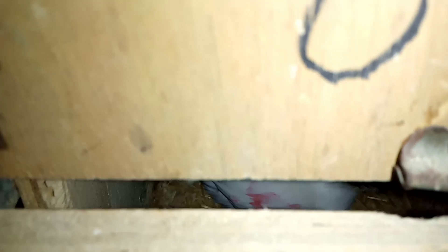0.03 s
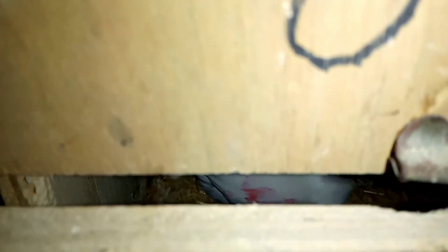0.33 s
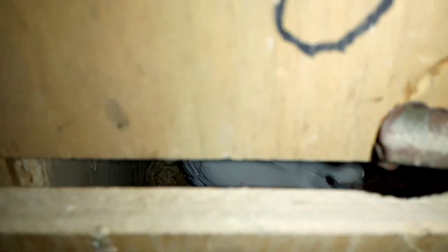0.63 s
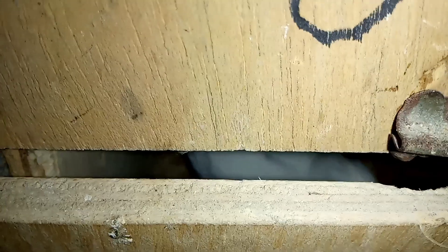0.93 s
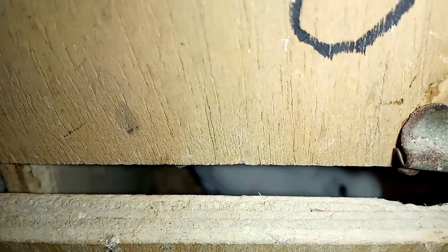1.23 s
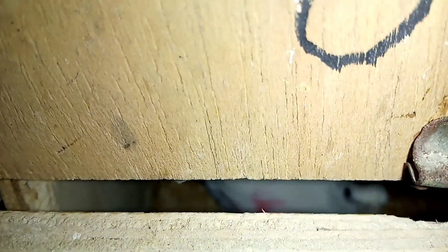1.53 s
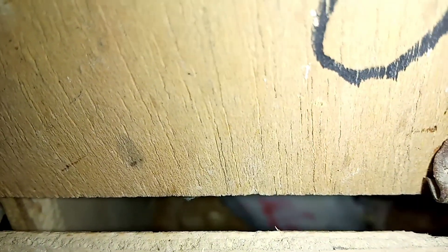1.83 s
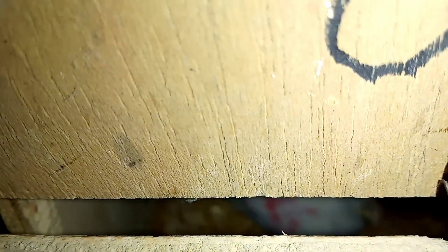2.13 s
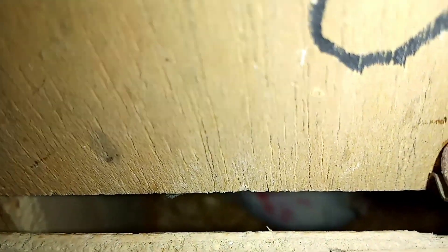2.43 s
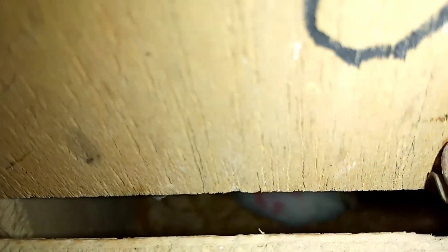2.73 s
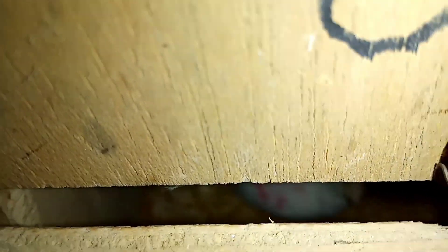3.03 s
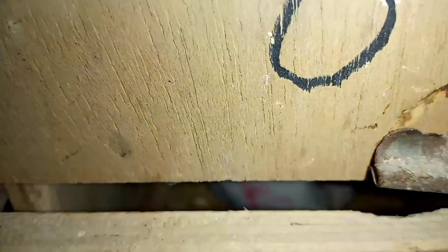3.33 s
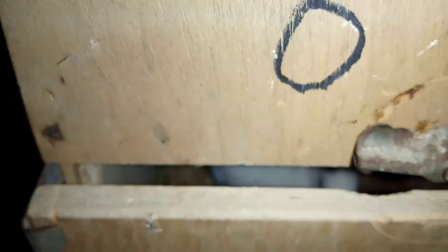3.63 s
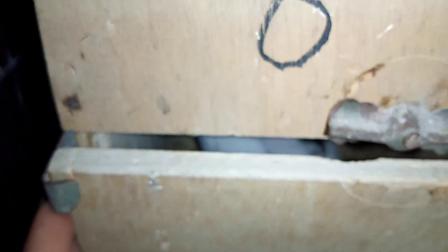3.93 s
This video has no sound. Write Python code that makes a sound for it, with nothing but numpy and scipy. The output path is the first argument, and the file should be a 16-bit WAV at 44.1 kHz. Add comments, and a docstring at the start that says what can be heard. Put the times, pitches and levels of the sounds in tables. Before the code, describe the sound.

A bird hisses breathily throughout, inside a wooden nest box that rings briefly. A hoarse arching cry comes at about 0.5 seconds, a harsh rasp at 1.7 and a weak cry at 2.3. The loudest cry follows near 2.9 seconds and another near 3.7. Thin, short falling whistles are scattered between them. Faint handling scuffs and a dull rub near the end lie over a low room hum.

```python
"""A steady hiss breaks into hoarse arching cries, thin falling whistles and one rasp.
It is a cockatiel inside a wooden nest box, heard through the gap under the lid. Turbulent air in
the open beak makes the hiss and rasp; cries and whistles are tones roughened by random modulation.
The box rings briefly. A few faint scuffs of handling and a dull rub lie over a low room hum."""
import sys
import numpy as np
from scipy import signal
from scipy.fft import rfft, irfft
from scipy.io import wavfile

SR = 44100
rng = np.random.default_rng(int(sys.argv[2]) if len(sys.argv) > 2 else 0)


def file_out(sig):
    """Save sig as 16-bit WAV at sys.argv[1]."""
    # one column per channel
    cols = np.atleast_2d(sig).T
    # limit, then scale
    lim = np.clip(cols, -1, 1)
    pcm = np.round(lim * 32767).astype(np.int16)
    wavfile.write(sys.argv[1], SR, pcm)


N = 176400
T = np.arange(N) / SR
EDGE_S, FLUTTER_HZ = .004, 133


def amp(db):
    """Amplitude ratio of a level in decibels."""
    return 10 ** (np.asarray(db) / 20)


def unit(x):
    """Normalisation to rms 1."""
    return x / np.sqrt(np.mean(abs(x) ** 2) + 1e-20)


def colour(x, spectrum):
    """Filtering by a gain curve, interpolated over log frequency."""
    hz, db = np.transpose(spectrum)
    gain_db = np.interp(np.log(np.fft.rfftfreq(N, 1 / SR) + 1), np.log(hz), db)
    return irfft(rfft(x) * amp(gain_db), N)


def noise(spectrum):
    """Spectrally shaped Gaussian noise of rms 1."""
    return unit(colour(rng.standard_normal(N), spectrum))


def wobble(rate_hz):
    """Random modulation: noise low-passed at the given rate."""
    t = T[::8]
    hz = np.fft.rfftfreq(len(t), t[1])
    slow = irfft(rfft(rng.standard_normal(len(t))) / np.sqrt(1 + (hz / rate_hz) ** 6), len(t))
    return np.interp(T, t, unit(slow))


def swell(times, db, t=T):
    """Amplitude envelope along a level curve, with Gaussian skirts beyond its ends."""
    outside_s = np.maximum(np.maximum(times[0] - t, t - times[-1]), 0)
    return amp(np.interp(t, times, db)) * np.exp(-np.minimum(outside_s / EDGE_S, 10) ** 2)


def room(noise_db=-58, fade_db_per_s=-4):
    """Ambient noise under a fading hum, whose tones waver by phase modulation."""
    # room noise spectrum: freq_hz, gain_db
    spectrum = [(22, -41), (35, -5.5), (100, 3), (380, -3), (600, -13.5), (2000, -7.5), (9000, -75),
                (16000, -41)]
    # hum tones halfway through the scene: pitch_hz, level_db
    tones = [(62.8, -67), (102.3, -70.5)]
    hum = sum(amp(db) * np.sqrt(2) * np.sin(2 * np.pi * hz * T + .5 * wobble(3.4)) for hz, db in tones)
    return amp(noise_db) * noise(spectrum) + hum * amp(fade_db_per_s * (T - T.mean()))


def handling(rise_s=.011, decay_s=.043, rub_at_s=3.64, rub_width_s=.14, rub_db=-56.5):
    """Friction noise: grainy scuffs with exponential rise and decay, and one dull rub."""
    # scuffs: peak_s, level_db
    scuffs = [(.418, -53), (.655, -51.5), (1.332, -56), (1.835, -57), (2.597, -53)]
    # scuff spectrum: freq_hz, gain_db
    scuff_spectrum = [(300, 7), (3000, 6.5), (8000, -0.5), (10500, -6.5), (13000, -16), (15500, 6)]
    # rub spectrum: freq_hz, gain_db
    rub_spectrum = [(100, -29), (330, 14.5), (560, -2), (780, 4), (1500, -44)]
    envelope = sum(amp(db) * np.exp(-np.maximum((s - T) / rise_s, (T - s) / decay_s)) for s, db in scuffs)
    rub = amp(rub_db) * np.exp(-((T - rub_at_s) / rub_width_s) ** 2) * noise(rub_spectrum)
    return envelope * noise(scuff_spectrum) * unit(amp(1.5 * wobble(200))) + rub


def box(x, mode_width_hz=36, t60_s=.49, treble_t60_s=.17, split_hz=5900, delay_s=.002, wet=.68):
    """Cavity resonance, then reverberation between the wooden walls; the treble dies first."""
    # modes of the box: freq_hz, lift_db
    modes = [(1500, 3.7), (2045, 2.1), (2420, 4.5), (2860, 1.2), (3530, 0.96), (7190, 4.8)]
    for hz, db in modes:
        x = x + (amp(db) - 1) * signal.lfilter(*signal.iirpeak(hz, hz / mode_width_hz, fs=SR), x)
    t = T[:SR // 2]
    echoes = rng.choice([-1., 1.], len(t)) * (rng.random(len(t)) < 3000 / SR)  # about 3000 a second
    low = signal.sosfiltfilt(signal.butter(4, split_hz, fs=SR, output="sos"), echoes, padlen=0)
    decay, treble_decay = amp(-60 * t / t60_s), amp(-60 * t / treble_t60_s)
    tail = (t > delay_s) * (low * decay + (echoes - low) * treble_decay)
    reverberation = signal.fftconvolve(x, tail / np.linalg.norm(echoes * decay))[:N]
    return np.sqrt(1 - wet ** 2) * x + wet * reverberation


def hiss(ring_db=-9, ring_width_hz=112):
    """Turbulence in the open beak, with a narrow throat resonance that slides in pitch."""
    # air noise spectrum: freq_hz, gain_db
    spectrum = [(800, -39), (1200, -20.5), (1520, -2), (1750, 1.5), (2080, 2.5), (2400, -7), (2700, -4.5),
                (2950, -7.5), (4500, -0.5), (5150, -5.5), (6400, -3.5), (6750, -11), (9800, -38),
                (13700, -49), (15200, -30)]
    # course of the hiss: time_s, level_db
    levels = [(0, -49), (.29, -49.5), (.38, -57.5), (.5, -53), (1, -49.5), (1.42, -48), (1.85, -46),
              (2.32, -46.5), (2.42, -56), (2.63, -48), (3.25, -46), (3.331, -53), (3.46, -54.5),
              (3.57, -46.5), (3.8, -50), (4, -46)]
    # throat resonance: time_s, centre_hz
    ring_pitch = [(0, 4486), (1.05, 4540), (1.3, 4174), (2.35, 4175), (2.55, 4560), (3.1, 4490),
                  (3.26, 4390), (3.5, 4610)]
    air = signal.sosfilt(signal.butter(3, 950, "high", fs=SR, output="sos"), noise(spectrum))
    cycles = np.cumsum(np.interp(T, *np.transpose(ring_pitch))) / SR
    ring = ((wobble(ring_width_hz) + 1j * wobble(ring_width_hz)) * np.exp(2j * np.pi * cycles)).real
    return (unit(air) + amp(ring_db) * unit(ring)) * swell(*np.transpose(levels)) * amp(1.31 * wobble(36))


def rasp(spit_width_s=.026):
    """Brighter turbulence under fast amplitude modulation: one long rasp and a few short spits."""
    # spectrum with the beak wide open: freq_hz, gain_db
    spectrum = [(1200, -29), (1750, -6), (2350, 2.5), (2650, -18), (3100, -34), (3550, 2.5), (4500, -1),
                (5150, -6), (5600, 2.5), (6450, 2.5), (7700, -6), (8100, -19.5), (15500, -44)]
    # course of the rasp: time_s, level_db
    levels = [(1.485, -45), (1.508, -42.5), (1.538, -48), (1.57, -46.5), (1.645, -51), (1.668, -37.5),
              (1.745, -39), (1.785, -50), (1.83, -52)]
    # spits of air on the hardest accents of the cries: peak_s, level_db
    accents = [(.468, -51), (2.337, -49), (2.836, -42.5), (2.936, -47.5)]
    spits = sum(amp(db) * np.exp(-((T - s) / spit_width_s) ** 2) for s, db in accents)
    return noise(spectrum) * (swell(*np.transpose(levels)) + spits) * unit(amp(1.5 * wobble(180)))


def wheeze(calls, jitter, breath_db, breath_hz, jitter_hz=234, shimmer=.2):
    """Harmonic tones with pitch jitter and amplitude shimmer; breath adds sidebands to each partial."""
    voice, drift = np.zeros(N), jitter * wobble(jitter_hz)
    partials = range(len(calls[0][2]))
    flutters = [unit(np.exp(shimmer * wobble(FLUTTER_HZ))) for _ in partials]
    breaths = [amp(breath_db) * unit(wobble(breath_hz) + 1j * wobble(breath_hz)) for _ in partials]
    for times, hz, levels, hoarse in calls:
        on = (T > times[0] - 2 * EDGE_S) & (T < times[-1] + 2 * EDGE_S)
        pitch_hz = np.interp(T[on], times, hz) * (1 + hoarse * drift[on])
        phase = 2 * np.pi * np.cumsum(pitch_hz) / SR
        for k in partials:
            partial = unit(((1 + hoarse * breaths[k][on]) * np.exp(1j * (k + 1) * phase)).real)
            voice[on] += swell(times, levels[k], T[on]) * flutters[k][on] * partial
    return voice


def whistles(settle_s=.0164, fade_db=-1, gain_db=1):
    """Single partials that glide exponentially down onto their pitch; steeper drops are rougher."""
    # whistled notes, plus at 3.17 s a brief swell of the hiss resonance near 4.4 kHz: start_s, length_s,
    # target_pitch_hz, relative_level_db, start_excess_ratio
    notes = [(0.075, 0.07, 2873, -46, 0.21), (0.162, 0.054, 2073, -41.5, 0.46),
             (.413, 0.013, 2535, -45.5, 0.05), (0.694, 0.029, 2844, -39, 0.023),
             (0.744, 0.038, 3160, -43, 0.024), (0.784, .075, 2523, -41, 0.085),
             (1.15, 0.025, 2540, -44.5, 0.042), (1.552, 0.017, 2530, -49, 0.0074),
             (1.576, 0.0088, 3560, -41, 0.063), (1.927, 0.04, 2526, -49, 0.17),
             (2.628, 0.049, 2443, -47.5, 0.059), (3.038, 0.043, 2810, -41.5, 0.092),
             (3.17, .09, 4414, -48.5, .03), (3.275, 0.032, 3130, -39.5, .26),
             (3.332, 0.0084, 3510, -38.5, 0.014), (3.363, 0.025, 2720, -36, .07),
             (3.395, 0.04, 2107, -42.5, 0.12), (3.702, 0.015, 3516, -36, 0)]
    calls = []
    for start, length, hz, db, drop in notes:
        t = np.linspace(0, length, num=20)
        pitch_hz = hz * (1 + drop * np.exp(-t / settle_s))
        hoarse = .58 + 1.87 * abs(drop)
        calls.append((start + t, pitch_hz, [db + fade_db * t / length], hoarse))
    return amp(gain_db) * wheeze(calls, jitter=.022, breath_db=1, breath_hz=303)


def cries(voice_db=2.5, air_db=-16.5):
    """Source and filter: the throat shapes four hoarse partials and air that follows the effort."""
    # one curve per cry, ahead of the throat filter: time_s, pitch_hz, fundamental_db, octave_db
    curves = [
        [(.285, 1556, -47.5, -50.5), (.44, 1389, -49, -65.5), (.46, 1568, -42.5, -46), (.5, 1795, -45.5, -41.5),
         (.545, 2384, -38, -45.5), (.567, 2326, -38.5, -42), (.588, 1747, -43.5, -35), (.615, 2132, -46, -40),
         (.655, 2342, -41, -63)],
        [(1.625, 1395, -56.5, -56), (1.68, 2005, -44.5, -58), (1.75, 2200, -46.5, -46)],
        [(2.32, 1658, -57, -75), (2.34, 1375, -52.5, -44), (2.38, 1264, -61.5, -57), (2.46, 1210, -54, -64)],
        [(2.817, 1651, -44, -48), (2.827, 1738, -47, -33), (2.845, 1913, -36.5, -44), (2.857, 2010, -35.5, -60),
         (2.9, 2458, -40, -71), (2.912, 2200, -44.5, -56), (2.922, 1940, -32, -35), (2.944, 1829, -38, -36.5),
         (2.97, 2284, -35.5, -72), (3.01, 2453, -43.5, -66)],
        [(3.55, 1249, -47.5, -63), (3.583, 1289, -57, -57), (3.595, 1525, -46, -53), (3.655, 1968, -44, -42),
         (3.7, 2452, -38, -37), (3.726, 1723, -43.5, -39), (3.755, 2320, -48.5, -42.5), (3.778, 2490, -36, -54),
         (3.795, 2370, -56, -65)],
    ]
    # scale of jitter and breath, one per cry: hoarseness_ratio
    hoarseness = [1.4, 1.38, 1.07, .6, 1.377]
    # throat response: freq_hz, gain_db
    throat = [(500, -19), (1100, -6), (1450, -0.5), (2450, -0.5), (2900, 1), (3400, 2.5), (4850, -3),
              (5400, -15), (6500, 2), (8500, -21)]
    calls, effort = [], np.zeros(N)
    for curve, hoarse in zip(curves, hoarseness):
        times, hz, fundamental_db, octave_db = np.transpose(curve)
        calls.append((times, hz, [fundamental_db, octave_db, octave_db - 24, octave_db - 33], hoarse))
        effort += swell(times, np.maximum(fundamental_db, octave_db))
    air = amp(air_db) * effort * noise(throat) * unit(np.exp(.52 * wobble(FLUTTER_HZ)))
    voice = wheeze(calls, jitter=.0357, breath_db=-11, breath_hz=427)
    return amp(voice_db) * colour(voice, throat) + air


def scene():
    """Superposition of the bird in its box, the handling and the room, in mono."""
    return (box(cries() + rasp() + whistles() + hiss()) + handling() + room())[None]


def record(dry, cutoff_hz=15900):
    """Band limiting by a linear-phase low-pass filter."""
    lowpass = signal.firwin(511, cutoff_hz, window=("kaiser", 9), fs=SR)
    return signal.oaconvolve(dry, lowpass[None], "same")


dry = scene()
out = record(dry)
file_out(out)
```